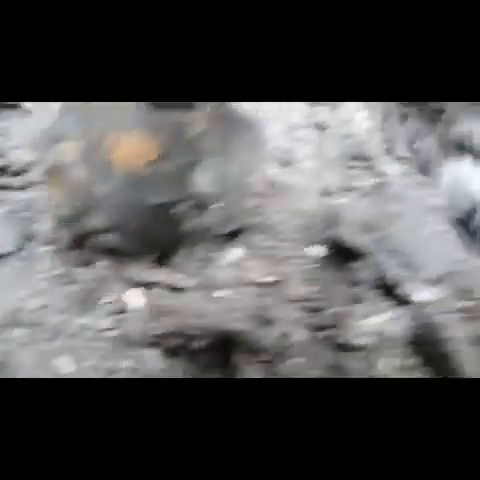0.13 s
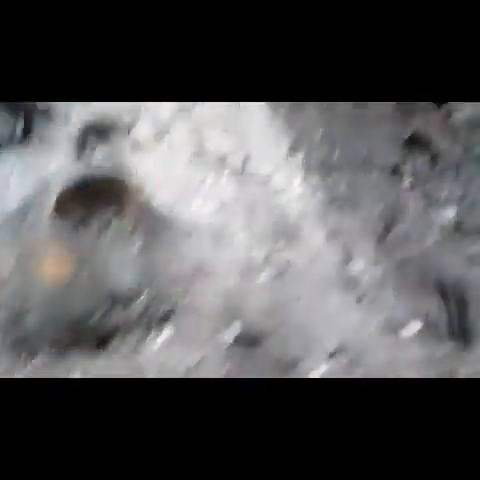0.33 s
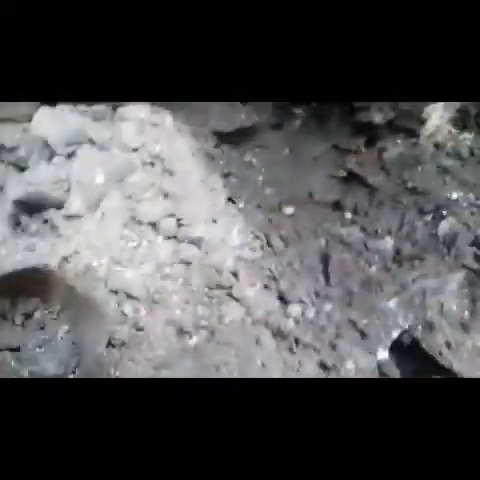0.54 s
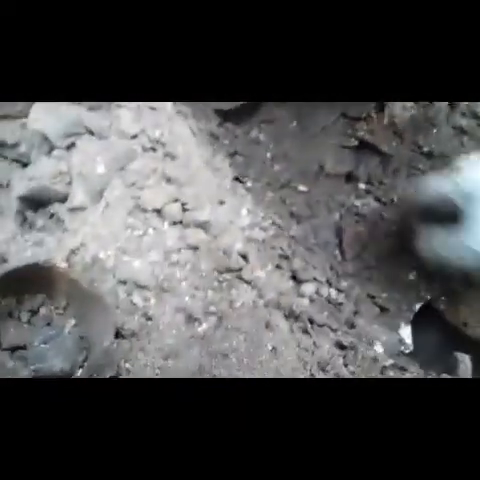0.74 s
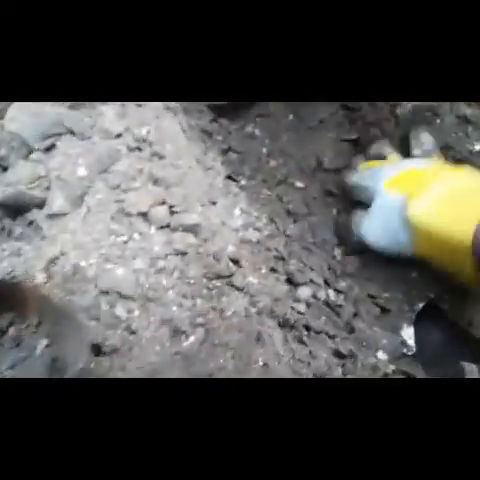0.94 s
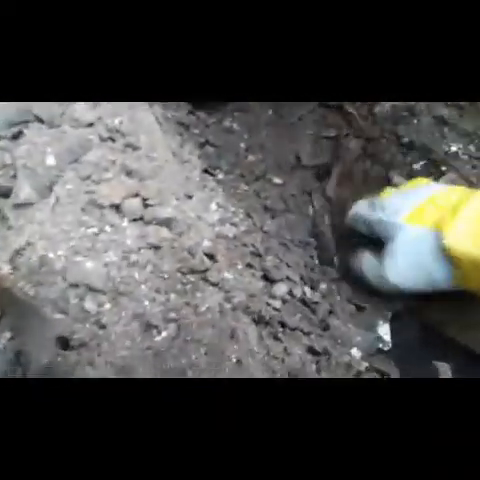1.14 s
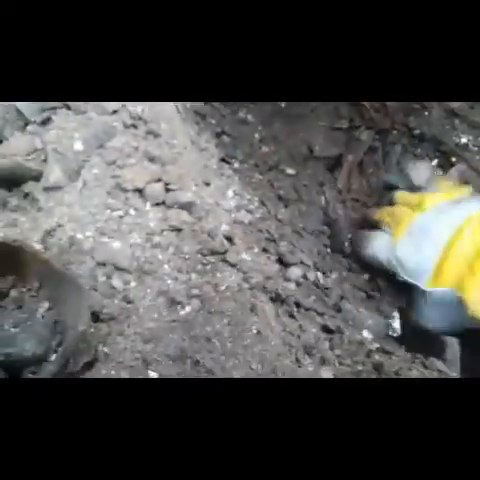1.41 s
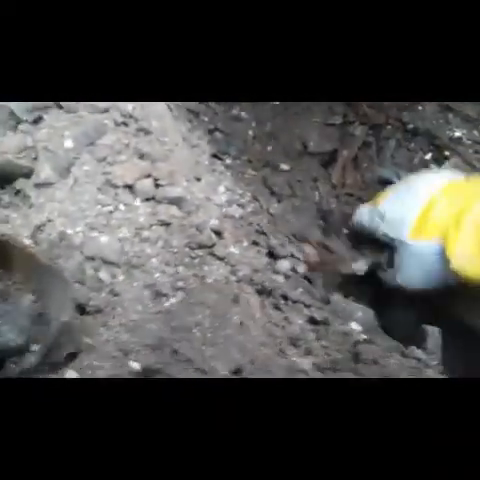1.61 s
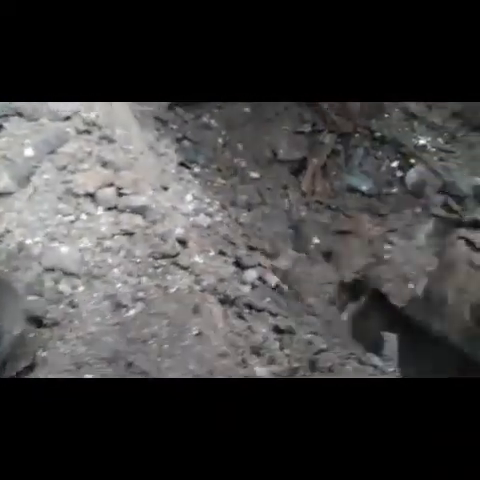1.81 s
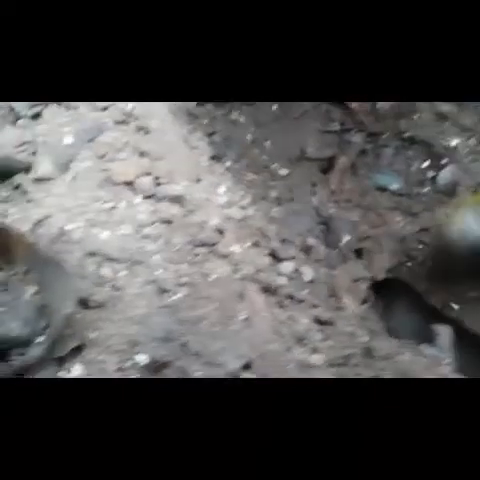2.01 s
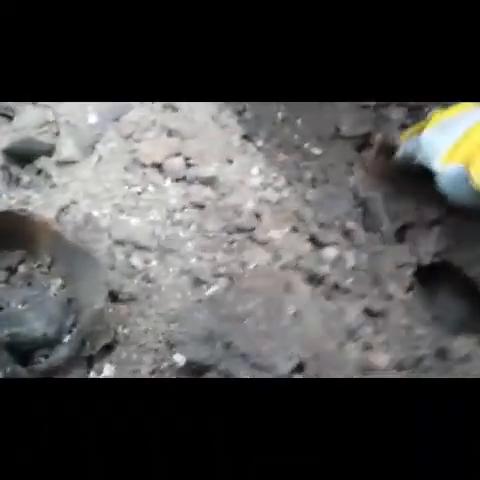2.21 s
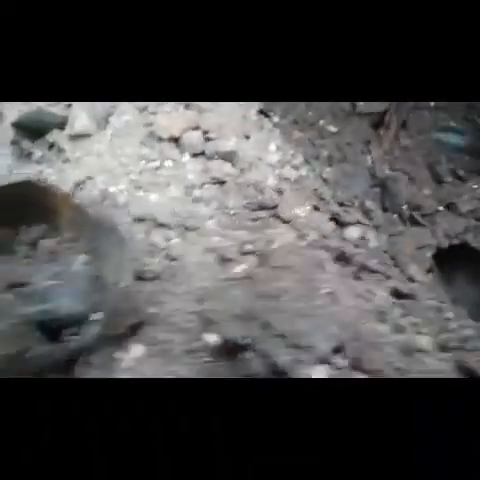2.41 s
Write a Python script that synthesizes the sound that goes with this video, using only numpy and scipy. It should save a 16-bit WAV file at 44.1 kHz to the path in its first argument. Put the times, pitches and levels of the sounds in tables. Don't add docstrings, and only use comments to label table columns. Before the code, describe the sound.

Glass and stone shards clink sharply as a gloved hand scrapes through gritty soil outdoors

```python
import sys
import numpy as np
from scipy import signal
from scipy.fft import rfft, irfft, next_fast_len
from scipy.io import wavfile
from scipy.ndimage import uniform_filter1d

SR = 44100
rng = np.random.default_rng(int(sys.argv[2]) if len(sys.argv) > 2 else 0)


def put_to_file(sound):
    columns = np.atleast_2d(sound).T
    safe = np.clip(columns, -1, 1)
    whole_steps = np.round(safe * 32767)
    wavfile.write(sys.argv[1], SR, whole_steps.astype(np.int16))


def decibels_to_gain(level_db):
    exponent = np.asarray(level_db, float) / 20
    return 10 ** exponent


N = 112454
PORT_LAG_S = 0.0001934


def evened(x):
    return x / np.sqrt(np.mean(x ** 2) + 1e-20)


def colour(x, points, lag_s=0):
    f, db = np.transpose(points)
    size = next_fast_len(x.shape[-1])
    hz = np.fft.rfftfreq(size, 1 / SR)
    gain = decibels_to_gain(np.interp(np.log(hz + 1), np.log(f + 1), db))
    delay = np.exp(-2j * np.pi * hz * lag_s)
    return irfft(rfft(x, size) * gain * delay, size)[..., :x.shape[-1]]


def add(mix, s, sound):
    part = mix[:, round(s * SR):][:, :sound.shape[1]]
    part += sound[:, :part.shape[1]]


def wobble(top_hz, count):
    return evened(colour(rng.standard_normal((count, N)), [(0, 0), (top_hz, 0), (10 * top_hz, -80)]))


def spread(x):
    share = 0.62
    late = colour(x[0], [(0, 0), (1, 0.045)], PORT_LAG_S)
    return np.sqrt(1 - share ** 2) * np.array([late, x[0]]) + share * x[1:]


def impacts(per_s, spread_db):
    size = decibels_to_gain(spread_db * np.minimum(rng.exponential(1, N), 4))
    return size * (rng.random(N) < per_s / SR)


# frequency in Hz, level in dB per Hz.
WIND_TONE = [(20, -50), (40, -28), (62, 0.5), (90, 1.5), (140, -9), (260, -11), (500, -10), (1000, -74)]
# frequency in Hz, level in dB per Hz.
AIR_TONE = [(100, -53), (600, -14.5), (2000, 7), (8000, -3), (13000, -17)]


def wind():
    port_mix = np.array([[0.51, 1, 1.2], [0.28, 1, 1.2]])
    rumble = evened(colour(port_mix @ rng.standard_normal((3, N)), WIND_TONE))
    rumble = rumble * decibels_to_gain(-59 + 2 * wobble(6.1, count=2))
    hiss = decibels_to_gain(-72) * evened(colour(rng.standard_normal((2, N)), AIR_TONE))
    left_right_db = np.array([[-2], [0]])
    return rumble * decibels_to_gain(left_right_db) + hiss


def grains(per_s, spread_db, grain_s, wash):
    decay = np.exp(-1 / SR / grain_s)
    puffs = evened(abs(signal.lfilter([1], [1, -decay], impacts(per_s, spread_db))))
    return spread((puffs + wash) * rng.standard_normal((3, N)))


# frequency in Hz, level in dB per Hz.
GRIT_TONE = [(1200, -16.5), (2500, 2), (3350, -3), (3900, -5.5), (6300, -4), (8200, 0.5), (9900, -13),
             (12800, -5)]


def chips():
    pitches, cycles = 24, 12
    t, hz = np.arange(300) / SR, np.geomspace(2300, 12800, num=pitches)[:, None]
    turns = hz * t
    pings = turns * np.exp(-turns / cycles * 2) * np.sin(2 * np.pi * turns)
    hits = impacts(per_s=600, spread_db=4)
    which = rng.integers(0, 3 * pitches, N) == np.arange(3 * pitches)[:, None]
    ticks = signal.oaconvolve((hits * which).reshape(3, pitches, N), pings[None], axes=2)[..., :N]
    return evened(colour(spread(ticks.sum(1)), GRIT_TONE))


# time in seconds, soil level in dB, grit relative to soil in dB.
HAND_PRESSURE = [(0, -66.5, -6), (0.214, -49.5, -0.5), (.33, -51, 1.5), (.45, -43, -4), (0.561, -46, 2.5),
                 (0.698, -55.5, 18), (0.829, -60.5, 6), (1.018, -70, 2), (1.096, -52, -15),
                 (1.25, -47, -2.5), (1.549, -57.5, -5.5), (1.824, -49.5, -2), (1.93, -63.5, -3),
                 (2.102, -57.5, 6), (2.171, -67.5, 7.5), (2.334, -52, -2), (2.432, -65, -5.5),
                 (2.55, -47.5, -9.5)]
# frequency in Hz, level in dB per Hz.
SOIL_TONE = [(150, -11), (400, -7), (900, -3.5), (2100, 1.5), (3400, -17.5), (4500, -17.5), (8300, -17.5),
             (10200, -42), (13000, -19.5)]


def scrape():
    s, soil_db, grit_db = np.transpose(HAND_PRESSURE)
    t = np.arange(N) / SR
    judder, flick = wobble(11.3, count=2)
    soil = evened(colour(grains(1900, spread_db=6.5, grain_s=0.0045, wash=0.067), SOIL_TONE))
    grit = evened(colour(grains(1000, spread_db=3.5, grain_s=0.0014, wash=0.7), GRIT_TONE))
    grit = grit + decibels_to_gain(-5) * chips()
    soil_level = 4.5 + np.interp(t, s, soil_db) + 2.5 * judder
    grit_level = 3.5 + np.interp(t, s, soil_db + grit_db) + 2 * evened(judder + flick)
    return soil * decibels_to_gain(soil_level) + grit * decibels_to_gain(grit_level)


# start in seconds, peak level in dB, pitch in Hz.
CLOD_KNOCKS = [(0.32, -34.5, 590), (0.335, -34.5, 897), (0.364, -36, 277), (0.383, -34.5, 1090),
               (0.443, -41.5, 1880), (0.502, -35, 997), (0.554, -42.5, 1010), (0.667, -34, 1660),
               (1.094, -45, 1730), (1.225, -40.5, 970), (1.243, -43, 1020), (1.363, -41, 1400),
               (1.679, -46.5, 268), (1.751, -38.5, 1830), (1.865, -40, 1450), (1.894, -39.5, 960),
               (2.318, -42, 1097), (2.352, -41, 1620), (2.465, -50, 1000), (2.516, -66, 1840)]


def clods():
    width, rise_s = 0.4, 0.002
    out, t = np.zeros((2, N)), np.arange(4000) / SR
    noises = rng.standard_normal((len(CLOD_KNOCKS), 3, len(t)))
    late = t - np.array([[PORT_LAG_S], [0]])
    for (s, peak_db, hz), noise in zip(CLOD_KNOCKS, noises):
        band = [(hz * width, -25), (hz, 0), (hz / width, -12), (14000, -30)]
        blur = evened(colour(spread(noise), band))
        knock = np.sin(2 * np.pi * hz * late) + 2.96 * blur
        t60 = 0.03 + 5.5 / hz
        fade = decibels_to_gain(peak_db - 0.5 - 60 * t / t60) * (1 - np.exp(-t / rise_s))
        add(out, s, fade * knock)
    return out


# frequency in Hz, level in dB per Hz.
CRACK_TONE = [(500, -22.5), (1500, -1), (3500, -2), (8200, -1.5), (9800, -9.5), (12800, -1)]


def clinks(rows, shards):
    rise_s = 0.0015
    lead_s, lead_db = 0.004, -13
    out, t = np.zeros((2, N)), np.arange(4000) / SR
    since = np.maximum(t - lead_s, 0)
    rise = np.tanh((since / rise_s) ** 2)
    swell = decibels_to_gain(lead_db) * np.minimum(t / lead_s, 1)
    quarter_turn = np.array([[0], [np.pi / 2]])
    hz, db = np.transpose(shards)[:, :, None, None]
    lucks = rng.standard_normal((len(rows), 3, len(shards), 2, 1))
    cracks = colour(rng.standard_normal((len(rows), 3, len(t))), CRACK_TONE)
    for (s, peak_db, main_hz, t60, crack_db), luck, noise in zip(rows, lucks, cracks):
        level_luck, pitch_luck, phase_luck = luck
        t60 = max(t60, 0.004)
        lag_s = PORT_LAG_S + 0.00012 * phase_luck[0, 0, 0]
        late = t - np.array([[lag_s], [0]])
        main = decibels_to_gain(-60 * since / t60) * np.sin(2 * np.pi * main_hz * t + quarter_turn)

        pitch = hz * (1 + 0.02 * pitch_luck[:, :1])
        mode_db = db + crack_db - 3.5 + 5 * level_luck
        mode_fade = decibels_to_gain(mode_db - 60 * since / (0.014 + 0.096 * t60))
        modes = mode_fade * np.sin(2 * np.pi * pitch * late + 9 * phase_luck)

        crack_fade = decibels_to_gain(crack_db + 3 - 60 * since / (0.013 + 0.04 * t60))
        crack = crack_fade * evened(spread(noise))
        body = np.maximum(rise, swell) * (main + modes.sum(0) + crack)
        add(out, s - lead_s - rise_s / 2, decibels_to_gain(peak_db + 4.5) * body / abs(body).max())
    return out


# start in seconds, peak level in dB, pitch in Hz, ring t60 in seconds, crack in dB.
FIRST_CLINKS = [(.3318, -40, 3080, 0.09, -8), (.3562, -26.5, 3466, 0.015, -8), (.446, -33, 2590, 0.07, 11),
                (0.5072, -33.5, 3630, 0.094, -6.5), (0.5987, -15, 3734, 0.16, -0.5),
                (0.6363, -29, 7680, 0.032, -11), (0.6449, -31.5, 7700, 0.065, 3),
                (0.6574, -19.5, 7530, 0.05, 9), (0.6826, -23, 2660, 0.098, 0), (0.6961, -21, 5280, .038, 0),
                (.702, -28, 8220, 0.055, -14), (.709, -27, 5480, 0.039, 0), (.728, -32, 6100, .02, 1),
                (.743, -19.5, 5660, 0.023, 10.5), (0.7381, -22, 7970, 0.097, -3),
                (0.7694, -34.5, 5850, 0.098, -14.5), (0.7876, -24.5, 8500, 0.052, 5.5),
                (.8122, -24, 6370, 0.013, 0.5), (.817, -35.5, 6400, 0.017, -20.5),
                (.824, -41, 5420, 0.015, -3), (0.844, -38.5, 9940, 0.034, -3),
                (0.8594, -35.5, 6710, 0.039, -3), (.9118, -27, 8450, 0.0094, -5.5),
                (0.9444, -45, 6090, 0.26, 3.5), (1.0152, -19, 8040, 0.017, -3.5),
                (1.4828, -21.5, 8150, 0.046, 4)]
# frequency in Hz, level in dB.
FIRST_SHARDS = [(2900, -16), (3760, -2), (5320, -9), (5800, -1), (6400, -5), (7950, -1), (10200, -9.5),
                (12400, -26)]


def first_heap():
    return clinks(FIRST_CLINKS, FIRST_SHARDS)


# start in seconds, peak level in dB, pitch in Hz, ring t60 in seconds, crack in dB.
SECOND_CLINKS = [(1.7482, -41, 3800, 0.015, -9), (1.8211, -28, 5720, .03, 3),
                 (1.7288, -34, 2880, 0.018, -4.5), (1.8038, -36, 5600, 0.049, 8),
                 (1.8417, -25.5, 7340, 0.03, 2), (1.8779, -32, 11130, 0.012, -27),
                 (1.8969, -33, 5040, 0.017, -7), (1.9238, -44, 4900, 0.018, 1),
                 (1.9363, -35.5, 4860, 0.015, 9), (1.943, -34, 4800, .04, 9), (1.961, -58, 12100, .02, -12),
                 (1.9688, -30, 4816, 0.025, -3), (1.987, -59, 7500, 0.035, -21),
                 (2.0006, -46, 3870, 0.017, 10), (2.0171, -30, 5500, 0.031, -3.5),
                 (2.023, -29, 2748, 0.023, 1.5), (2.048, -43, 7000, 0.014, -6),
                 (2.035, -39, 2790, 0.035, -20), (2.0553, -25.5, 6180, 0.051, 5),
                 (2.061, -23.5, 12260, 0.016, -9.5), (2.0787, -27, 6660, 0.024, 2),
                 (2.087, -34.5, 6280, 0.028, -4), (2.101, -34, 4230, 0.021, 12),
                 (2.123, -35, 8000, 0.013, 5), (2.131, -33, 5020, 0.022, 11),
                 (2.1109, -30.5, 4800, 0.029, 8), (2.142, -27, 5080, 0.014, -4),
                 (2.1793, -28.5, 4880, 0.032, -7), (2.1893, -19.5, 12260, 0.054, 1.5),
                 (2.194, -26, 4780, 0.25, 3.5), (2.207, -23.5, 2579, 0.065, 6),
                 (2.227, -26.5, 4260, 0.021, 3), (2.2413, -24, 5090, 0.031, 10),
                 (2.252, -42, 9000, 0.0093, 5), (2.265, -32, 6550, 0.012, 3),
                 (2.2848, -24, 2886, 0.018, 4.5), (2.293, -34, 2425, 0.045, -4)]
# frequency in Hz, level in dB.
SECOND_SHARDS = [(2450, -2), (3700, -14), (4780, -9.5), (5300, -11.5), (6300, -4), (8000, -3.5),
                 (10800, -13.5), (12400, -11.5)]


def second_heap():
    return clinks(SECOND_CLINKS, SECOND_SHARDS)


def thump():
    glide_s, snap_s, t60 = 0.0011, 0.00096, 0.084
    out, t = np.zeros((1, N)), np.arange(8000) / SR
    turns = 59.4 * t + 0.76 * (1 - np.exp(-t / glide_s))
    level_db = -15.5 - 60 * t / t60 + 8.5 * np.exp(-t / snap_s)
    swing = -decibels_to_gain(level_db) * np.sin(2 * np.pi * turns)
    add(out, 2.1897, swing[None])
    left_right_db = np.array([[-48], [0]])
    return out * decibels_to_gain(left_right_db)


# frequency in Hz, left minus right in dB.
PORT_TONE = [(200, -2.5), (500, -1), (1200, 2), (2500, 1), (4500, -2.5), (8000, -2), (12000, -1)]


def ports(x):
    left = colour(x[0], [(f, db / 2) for f, db in PORT_TONE])
    right = colour(x[1], [(f, -db / 2) for f, db in PORT_TONE])
    return np.array([left, right])


def scene():
    hand = scrape() + clods() + first_heap() + second_heap()
    return wind() + ports(hand) + thump()


def drop_weak(x, size, bins, frames, wide, long, mask_db):
    hz, t, z = signal.stft(x, SR, nperseg=size, noverlap=size // 2)
    power = uniform_filter1d((abs(z) ** 2).mean(0), bins, axis=0)
    power = uniform_filter1d(power, frames, axis=1)
    around = uniform_filter1d(uniform_filter1d(power, wide, axis=0), long, axis=1)
    weak = (power < around * decibels_to_gain(-2 * mask_db)) & (hz > 1600)[:, None]
    total = power.mean(0)
    weak &= total < decibels_to_gain(2 * 1.5) * uniform_filter1d(total, size=5)
    block = np.ix_(np.arange(len(hz)) // bins * bins, np.arange(len(t)) // frames * frames)
    z = z * np.where(weak[block], decibels_to_gain(-35), 1.)
    return signal.istft(z, SR, nperseg=size, noverlap=size // 2)[1][:, :N]


def starve(x):
    x = drop_weak(x, 256, bins=6, frames=2, wide=41, long=9, mask_db=8.5)
    return drop_weak(x, 2048, bins=12, frames=1, wide=110, long=1, mask_db=6.5)


def top_cut(x):
    return signal.sosfilt(signal.butter(12, 14320, fs=SR, output="sos"), x)


def record(dry):
    edge = [(13000, 0), (14000, -42), (17000, 1.3 * -42)]
    return top_cut(colour(starve(dry), edge))


dry = scene()
out = record(dry)
put_to_file(out)
```